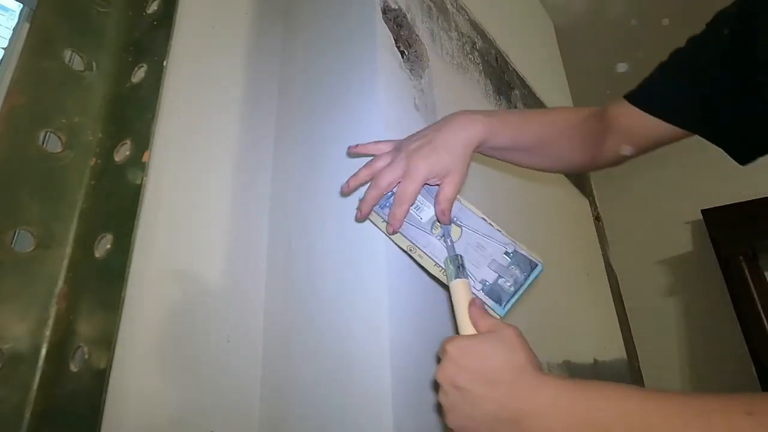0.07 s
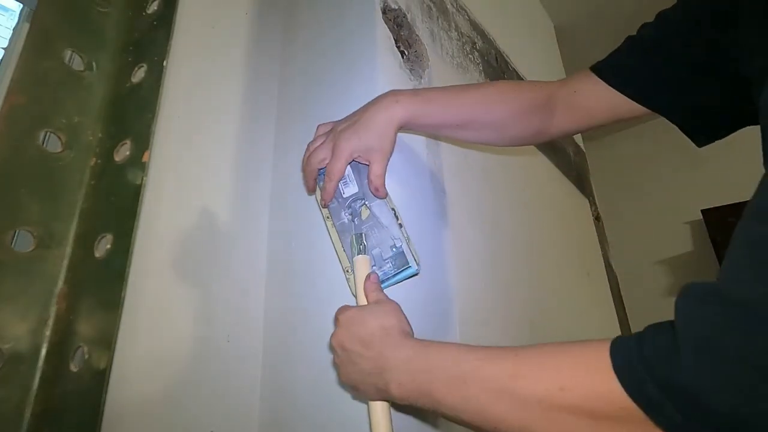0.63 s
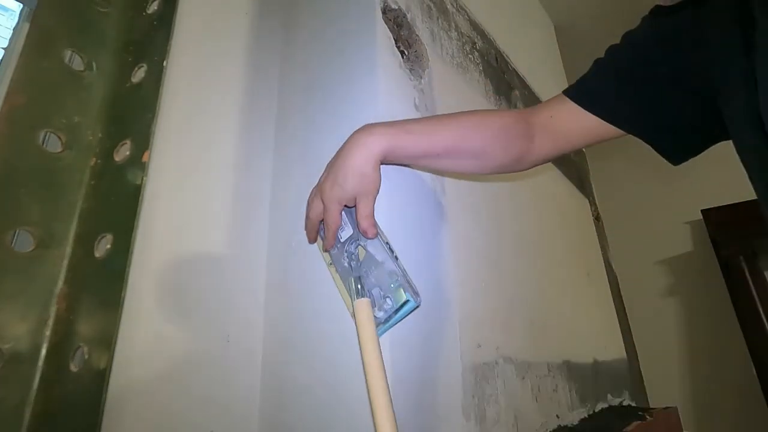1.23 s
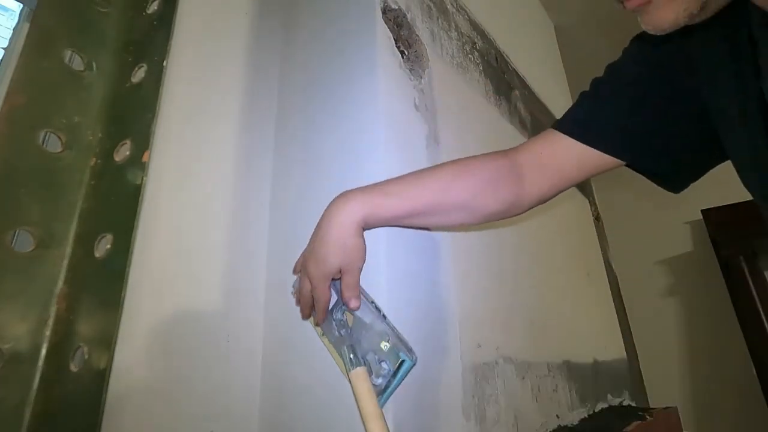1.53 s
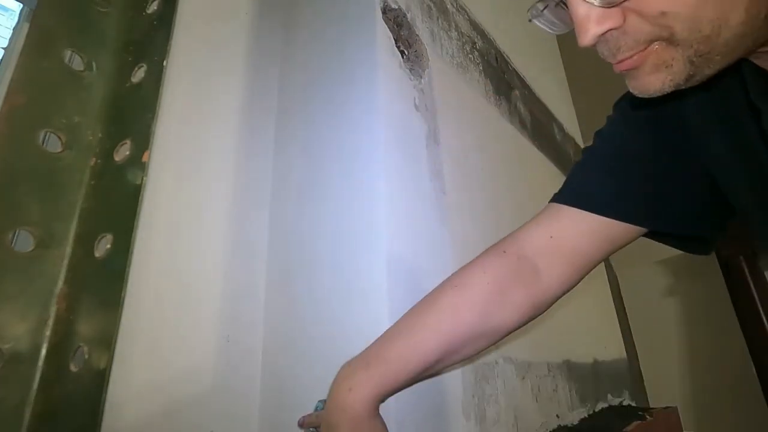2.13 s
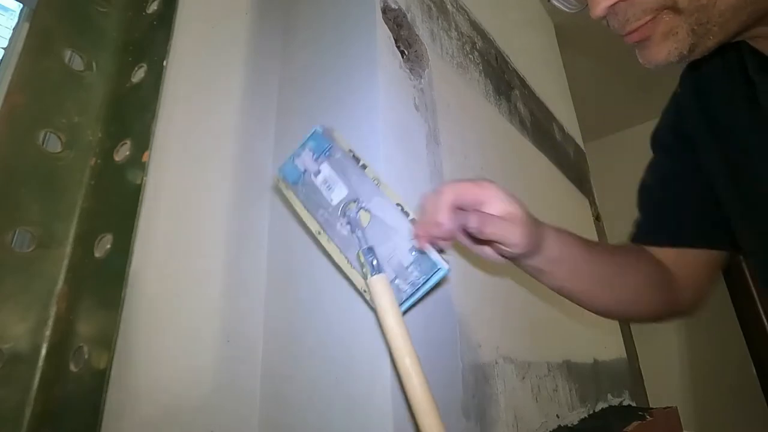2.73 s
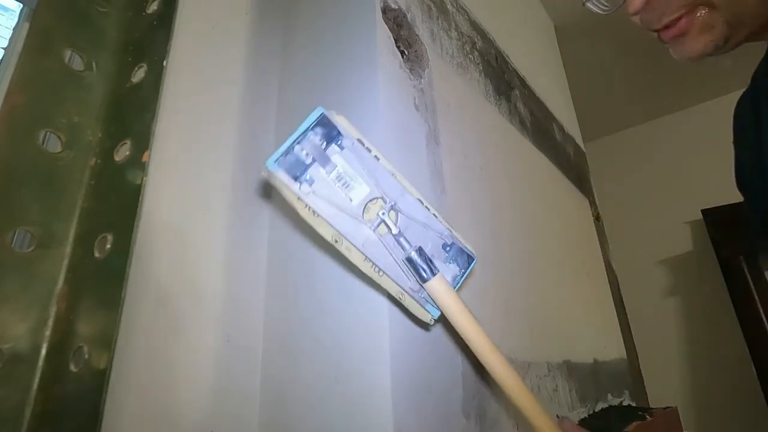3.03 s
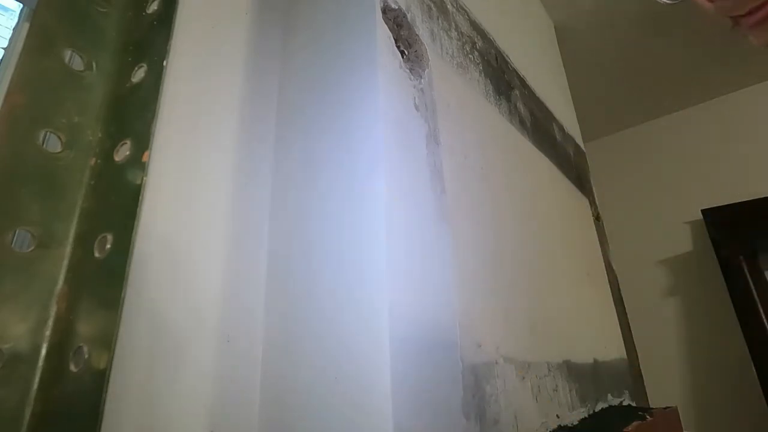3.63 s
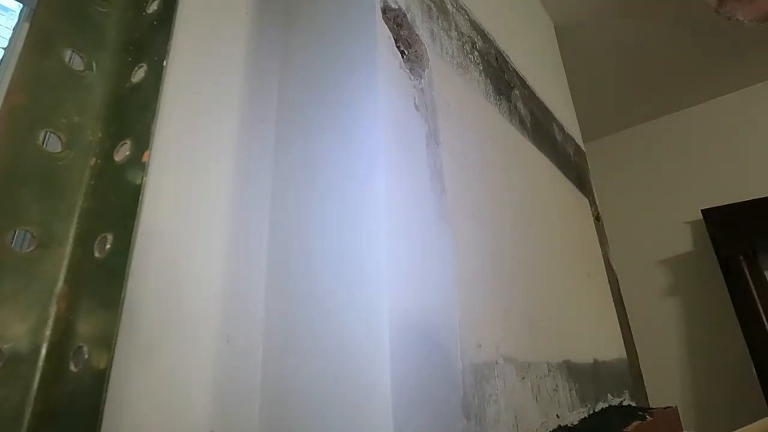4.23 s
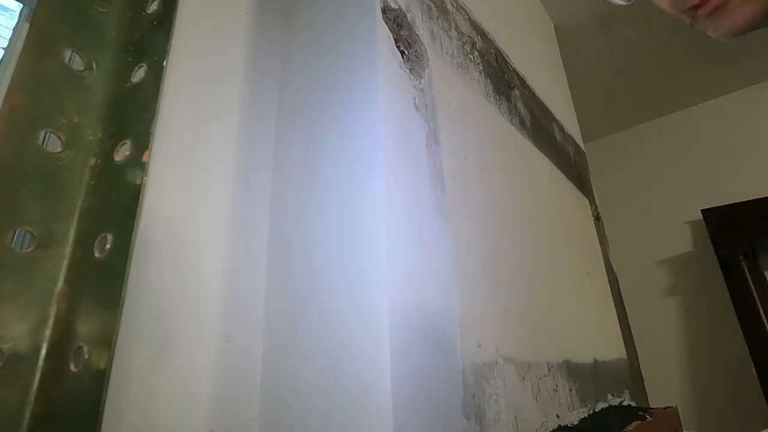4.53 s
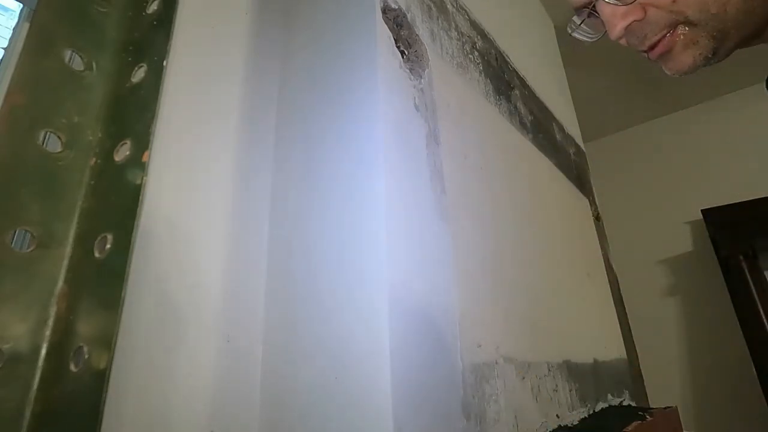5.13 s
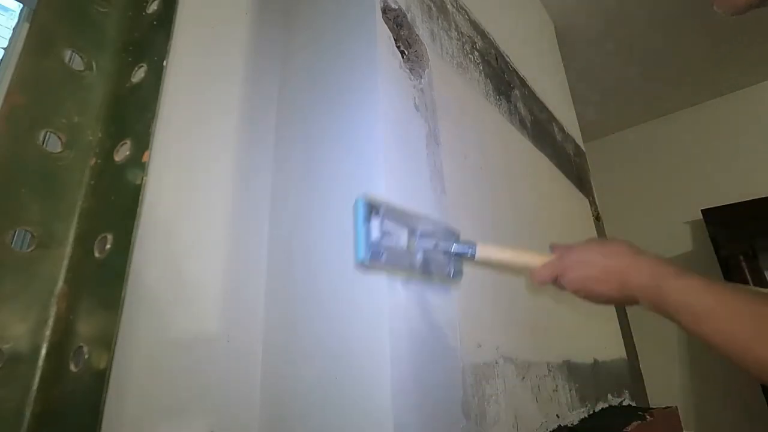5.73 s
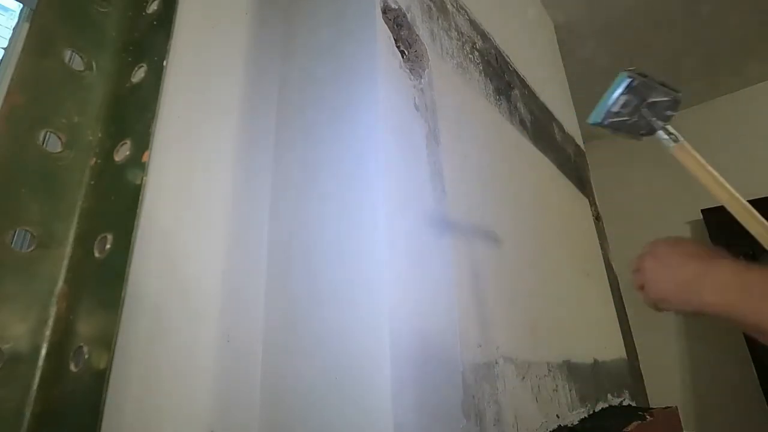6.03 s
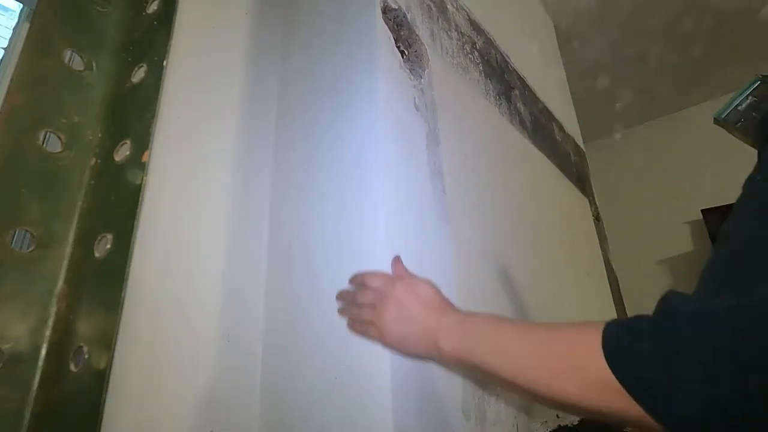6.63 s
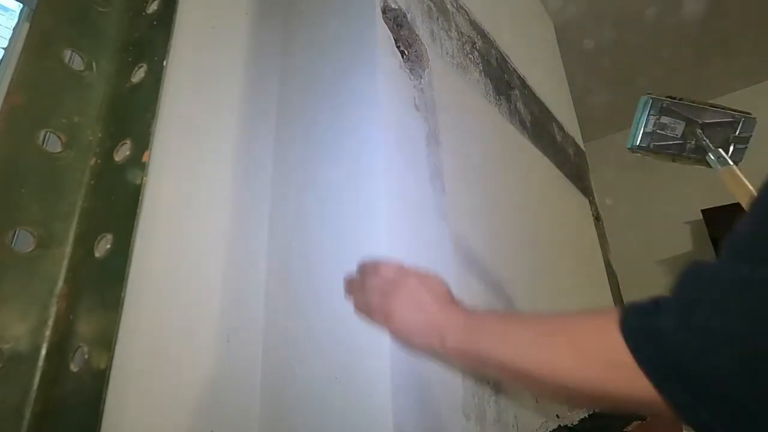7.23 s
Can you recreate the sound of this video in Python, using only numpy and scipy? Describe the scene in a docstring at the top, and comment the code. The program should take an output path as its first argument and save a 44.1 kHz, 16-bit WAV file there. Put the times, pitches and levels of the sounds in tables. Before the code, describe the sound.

A pole sander scrapes dry plaster close to the microphone in a bare, echoing room. Its plastic head clacks between short hissing strokes. During one long stroke the pole judders along the floor with a low rattle. More strokes follow, mixed with clacks, dull bumps, tiny squeaks and a longer run along the wall. Finally a bare palm brushes off the dust with a softer, hollow hiss.

```python
"""A pole sander works dry plaster, close by, in a bare, ringing room. First its plastic head clacks on
the swivel and its abrasive pad hisses in short strokes. On the long down stroke the pole judders along
the floor by stick-slip friction. More strokes follow, with clacks, dull bumps, brief squeaks and a run
along the wall. Last, a bare palm wipes off the dust with a softer, hollow hiss."""
import sys
import numpy as np
from scipy import signal
from scipy.fft import rfft, irfft
from scipy.io import wavfile
from scipy.ndimage import uniform_filter1d

SR = 44100
rng = np.random.default_rng(int(sys.argv[2]) if len(sys.argv) > 2 else 0)


def transcribe(signal):
    """Save signal, clipped to [-1, 1], as a 16-bit WAV file at the path in sys.argv[1]."""
    frames = np.atleast_2d(signal).T
    limited = np.clip(frames, -1, 1)
    pcm = np.round(limited * 32767).astype(np.int16)
    wavfile.write(sys.argv[1], SR, pcm)


N = 325899
TIME = np.arange(N) / SR
FREQ = np.fft.rfftfreq(N, 1 / SR)


def pad(catch_db=0.53, lean_db=0.97, usual_db=-40, thinning=0.42):
    """Abrasion: grains snap off the plaster, and the resonances of the pressed pad colour their hiss."""
    # short strokes: start t/s, fastest t/s, end t/s, relative level/dB, fizz/dB re hiss, note f/Hz, emphasis
    strokes = [(0.21, .295, .33, -45, -14.5, 3250, 1.2), (0.324, 0.434, .485, -54, -21, 3150, 1.1),
               (0.805, 0.853, .91, -58, -13.5, 2860, .7), (0.857, 0.95, 1.11, -60, -3, 3350, 0.55),
               (1.093, 1.179, 1.275, -33, -8.5, 3800, 0.44), (2.777, 2.85, 2.858, -50, -27, 3420, 1.2),
               (3.68, 3.74, 3.88, -49.5, -30, 3450, 4.6), (3.834, 3.997, 4.09, -41, -9, 4240, 0.23),
               (4.06, 4.069, 4.16, -56, -12.5, 3800, .4), (4.518, 4.556, 4.6, -61, -6, 3640, 0.22),
               (4.701, 4.825, 4.935, -36, -5.5, 4920, 0.84), (5.016, 5.066, 5.12, -61.5, -23, 3520, 0.37),
               (5.918, 5.958, 6.02, -51, -15, 3550, .3), (6.005, 6.01, 6.032, -46, -19, 3550, 0.86)]
    # long runs down and along the wall: t/s, relative level/dB, fizz/dB re hiss, note f/Hz, emphasis
    down_run = [(1.26, -57, -10, 3880, 0.85), (1.27, -48.5, -6.5, 4010, 0.65), (1.406, -41, -9, 3920, 0.4),
                (1.602, -42.5, -8.5, 4200, 0.93), (1.684, -37.5, -7.5, 3730, 0.36),
                (1.744, -33.5, -6.5, 4200, 0.85), (1.876, -37, 1.5, 4270, 0.85),
                (1.94, -41.5, -14, 3800, 0.68), (2.106, -47.5, -25, 3650, 0.64),
                (2.206, -55, -15, 3920, 0.76), (2.334, -50.5, -7, 4380, 0.7),
                (2.546, -48.5, -1, 4300, 0.31), (2.61, -57, -8, 4340, 0.85)]
    side_run = [(5.185, -60, -6, 3660, 0.4), (5.209, -37, -9.5, 3660, 0.15), (5.291, -35, -4.5, 3280, 0.37),
                (5.399, -36, -2.5, 3300, 0.44), (5.607, -39, -7, 3700, 0.24),
                (5.645, -36.5, -9, 3360, 0.24), (5.727, -36.5, -6.5, 3400, 0.43),
                (5.757, -40.5, -1.5, 3390, 0.3), (5.8, -58, 4, 3570, 0.31)]
    # spectrum of grit on plaster: f/Hz, spectral level/dB
    grit = [(88, -67), (150, -24), (182, -16), (212, -44), (363, -18.5), (741, -12.5), (1180, -9),
            (1370, -9.5), (3200, 0.5), (4270, 1.5), (7170, -12), (9040, -24), (11200, -26), (13000, -37),
            (14900, -50)]
    scratch = grains(per_s=22000, spread_db=2.0) * amp(catch_db * wander(130) + lean_db * wander(12))
    for hz in (2200, 3100, 5200):  # patches of the pad touch and lift, each singing its own drifting band
        touch = .45 * wander(5)
        scratch = scratch + touch * resonate(scratch, hz * np.exp(.08 * wander(3)), width_hz=350)
    body, core, fizz = split(coloured(scratch, grit), [1250, 6000])

    def rub(*controls):
        """One sliding contact, as onset and sound: low body, hiss with two resonances, and high fizz."""
        on = controls[0] > 0
        gate, db, fizz_db, note_hz, emphasis, body_db = (np.broadcast_to(c, N)[on] for c in controls)
        note = resonate(core[on], note_hz, width_hz=320)
        low_note = .29 * resonate(core[on], .35 * note_hz, width_hz=200)
        hiss = (core[on] + emphasis * (note + low_note)) / np.sqrt(1 + .5 * emphasis ** 2)
        # a thin pad radiates little bass: the body grows more slowly than the hiss
        body_db = np.minimum(body_db - thinning * (db - usual_db), -14)
        return TIME[on][0], gate * amp(db) * (hiss + amp(body_db) * body[on] + amp(fizz_db) * fizz[on])

    out = np.zeros(N)
    for start, fastest, end, db, fizz_db, note_hz, emphasis in strokes:
        arch_db = db + swing(start, fastest, end, ends_db=-19)
        add(out, *rub(window(start, end), arch_db, fizz_db, note_hz, emphasis, -20))
    for run, run_db, body_db in (down_run, 1, -20.5), (side_run, .5, -26):
        gate, db, fizz_db, note_hz, emphasis = played(run)
        note_hz = note_hz * np.exp(-.75 * np.maximum(fizz_db + 6.5, 0))  # the note dives in strong fizz
        add(out, *rub(gate, db + run_db, fizz_db, note_hz, emphasis, body_db))
    return out


def clacks(scuff_s=0.0056, tick_s=0.0077, thud_s=.011, lead_s=.006):
    """Impact excites the head's modes; the flatter the blow, the more plate and thud. Returns near, spread."""
    # blows: t/s, peak level/dB, relative plate level/dB, relative tick level/dB, rim f/Hz
    blows = [(0.017, -52, -25, -29, 3460), (0.156, -39.5, -13.5, -18, 3850),
             (0.1709, -33.5, -15, -22, 3830), (0.1964, -40.5, -12, -17, 3360),
             (0.2296, -22.5, -18, -22, 3350), (0.3103, -22.5, -26, -25.5, 3436),
             (0.4865, -43.5, 3, -5, 3900), (0.4986, -35, -10.5, -23, 3320), (0.7014, -33.5, -16, -21, 4010),
             (0.9233, -40.5, -11.5, -5, 2990), (0.9437, -39.5, -9, -27, 3420),
             (2.8438, -35.5, -21, -28.5, 3550), (2.9046, -34.5, -17.5, -23, 3543),
             (2.9893, -36, -17, -46, 3760), (3.6113, -51.5, 0, -23.5, 3800), (3.6557, -33.5, -9, -15, 3360),
             (3.6677, -25, -12, -20, 3650), (3.6738, -30, 2, -22, 3900), (3.6835, -21, -19.5, -39, 3515),
             (3.6961, -31.5, -8, -34, 3650), (3.9532, -29.5, -6, -7, 3310), (4.0539, -30, -8, -11.5, 3600),
             (4.1689, -26, -15.5, -11, 3240), (4.272, -46, -22, 3, 3740), (4.337, -36.5, -10, -10, 3190),
             (4.3475, -33, -4, -7, 3920), (5.9606, -38.5, -28, -5, 3420), (6.022, -27.5, -33, -12.5, 3680),
             (6.032, -29.5, -28, -21, 3470), (6.0652, -37, -26, -1, 3430), (6.2657, -47, -13, -20, 3980),
             (6.2808, -44, -5, -14, 3450), (6.5373, -49.5, -16, -21, 3770)]
    # modes of the broad plate and of the stiff rim (pitched at 3550 Hz): f/Hz, level/dB, t60/s
    plate_modes = [(1000, -19.5, 0.015), (1300, -2, 0.017), (1536, 3.5, 0.023), (2000, 1.5, 0.024),
                   (2250, -13, 0.0048)]
    rim_modes = [(2700, -17, 0.087), (3180, 8.5, 0.0015), (3460, -1, 0.0028), (3550, -1, 0.036),
                 (4010, 0.5, 0.008), (4700, -15.5, 0.0071)]
    t, near, spread = TIME[:6000], np.zeros(N), np.zeros(N)
    for s, db, plate_db, tick_db, rim_hz in blows:
        scuff_noise, tick_noise, thud_noise, burst_noise = rng.standard_normal((4, len(t)))
        scuff = scuff_noise * np.exp(-t / scuff_s)
        force = .5 * (t == 0) + .5 * scuff / np.linalg.norm(scuff)  # half clean impulse, half grit
        # grip and point of impact vary the modes from blow to blow
        plate = ring(plate_modes, t, spread_db=2.5, scatter=.05)
        rim = ring(rim_modes, t * rim_hz / 3550, spread_db=2.0, scatter=.02)
        plate, rim = (band(signal.fftconvolve(force, x)[:len(t)], 680, 7000) for x in (plate, rim))
        tick = band(band(tick_noise * np.exp(-t / tick_s), 3200, 5780), 1700, 9000)
        thud = band(thud_noise * np.exp(-t / thud_s), 180, 1220, order=4)
        parts = (rim, 0), (plate, plate_db + 9), (tick, tick_db + 11), (thud, plate_db - 1)
        blow = sum(amp(part_db) * x / abs(x).max() for x, part_db in parts)
        blow = amp(db) * blow / abs(blow).max()
        add(near, s, blow)
        # the pad's edge grazes the wall just before the blow
        graze = evened(band(rng.standard_normal(len(t)), 1300, 4500)) * (t / lead_s) * (t < lead_s)
        add(near, s - lead_s, amp(db - 27.5) * graze)
        # spread over all directions into the room, the modes merge into one broad burst
        burst = band(band(burst_noise * np.exp(-t / 0.004), 1800, 8000, order=1), 330, 3810, order=3)
        burst *= np.linalg.norm(blow) / np.linalg.norm(burst)
        add(spread, s, amp(-7) * (.5 * blow + burst))
    return near, spread


def judder(start_s=1.884, length_s=0.53, attack_s=.016, slips_hz=76, brake_db=-33):
    """Stick-slip friction: the pole's foot rattles over the floor and brakes; each slip shakes the wood."""
    # spectrum of the shaken pole: f/Hz, spectral level/dB
    pole = [(29, -67), (50, -3), (107, -20.5), (144, -2), (199, -2), (252, -2.5), (314, 1), (365, -5),
            (502, 3), (658, 1), (728, -9.5), (805, -1), (921, -11.5), (1810, -19), (2800, -31.5),
            (3640, -70), (6160, -120)]
    age = np.clip(TIME - start_s, 0, length_s)
    gate = np.minimum(age / attack_s, 1) * (age < length_s)
    db = -36.95 + brake_db * (age / length_s) ** 2.81
    boom_db = -2.5 - 37 * age  # the boom dies first
    cycles = np.cumsum(slips_hz * np.exp(.25 * wander(40))) / SR
    slips = .45 + np.exp(-(cycles % 1) / .35)
    slips *= amp(1.3 * evened(band(wander(60), 25, 60)))
    boom, core, rasp = split(coloured(slips * rng.standard_normal(N), pole), [350, 1000])
    core = core / np.sqrt(uniform_filter1d(core ** 2, size=2400))  # the hand pushes steadily
    return band(gate * amp(db) * (core + amp(boom_db) * boom + amp(-4.5) * rasp), 105, 5200)


def palm(flutter_db=0.4):
    """Cavity resonance: the hollow under the hand lifts one band of friction noise and damps a lower one."""
    # sweeps: start t/s, fastest t/s, end t/s, relative level/dB, fizz/dB re hiss, hollow's first, last f/Hz
    wipes = [(6.554, 6.584, 6.77, -57.5, -11.5, 3350, 3000), (6.653, 6.704, 7.08, -54, -14.5, 2760, 2480),
             (6.785, 6.92, 7.065, -54.5, -14, 2700, 1970), (7.11, 7.35, 7.52, -49, -11, 2300, 3100)]
    # spectrum of skin on dusty plaster: f/Hz, spectral level/dB
    skin_spectrum = [(180, -61), (300, -47), (365, -19), (451, -41), (586, -22), (636, -36), (911, -27.5),
                     (1670, -10), (2680, -9.5), (7030, -4), (8980, -13.5), (11300, -15.5), (14900, -38)]
    brush = grains(per_s=16000, spread_db=1.5) * amp(flutter_db * wander(70))
    skin, fizz = split(coloured(brush, skin_spectrum), [5000])
    out = np.zeros(N)
    for start, fastest, end, db, fizz_db, from_hz, to_hz in wipes:
        hollow_hz = np.interp(TIME, [start, end], [from_hz, to_hz])
        hiss = skin + 1.1 * resonate(skin, hollow_hz, width_hz=480)
        hiss = evened(hiss - .65 * resonate(hiss, .55 * hollow_hz, width_hz=650))
        level = window(start, end) * amp(db + swing(start, fastest, end, ends_db=-10))
        out += level * (hiss + amp(fizz_db) * fizz)
    return out


def bumps(width_hz=130):
    """Damped resonance: soft blows on wood and wall each leave a short rumble round one pitch."""
    # blows of pole and hand: t/s, level/dB, f/Hz, t60/s
    blows = [(3.667, -58, 272, 0.58), (4.169, -56, 202, 0.22), (4.339, -56.5, 400, 0.35),
             (4.37, -58.5, 234, 0.21), (5.297, -68, 363, 0.061), (6.031, -60, 443, 0.27),
             (6.086, -68, 284, 0.34), (6.270, -62, 600, 0.77), (6.576, -69, 172, 0.4)]
    t, out = TIME[:SR // 2], np.zeros(N)
    for s, db, hz, t60 in blows:
        force = rng.standard_normal(len(t)) * decay(t, t60)
        rumble = resonate(resonate(force, hz, width_hz), hz, 2 * width_hz)
        add(out, s, amp(db) * rumble / rumble[:1300].std())
    return band(out, 119, 2000, order=5)


def squeaks(waver=0.004, rough_db=-2.0):
    """Friction-driven oscillation: the swivel binds for a moment and sings a thin, unsteady note."""
    # moments of binding: t/s, duration/s, f/Hz, level/dB
    binds = [(4.051, 0.009, 2670, -43.5), (4.165, 0.021, 1690, -48.5), (4.585, 0.014, 1187, -59.5),
             (5.926, 0.1, 1635, -61)]
    out, bend, grip = np.zeros(N), 1 + waver * wander(150), amp(rough_db * wander(110))
    for s, length, hz, db in binds:
        at = np.arange(round(s * SR), round((s + length) * SR))
        phase = 2 * np.pi * np.cumsum(hz * bend[at]) / SR
        note = np.sin(phase) * grip[at] * signal.windows.tukey(len(at), .4)
        add(out, s, amp(db) * evened(note))
    return out


def room_tail(first_s=0.0017, echoes_per_s=5000):
    """Reverberation: dense reflections off bare walls, each band dying at its own rate; energy 1."""
    # reverberation times: f/Hz, t60/s
    room = [(100, 1.8), (300, 1.88), (600, 1.29), (1200, 0.98), (3500, 0.86), (6000, 0.83), (12000, 0.77)]
    size = 2 * SR
    echoes = rng.standard_normal(size) * (rng.random(size) < echoes_per_s / SR) * (TIME[:size] > first_s)
    hz, t, bands = signal.stft(echoes, SR, nperseg=256)
    tail = signal.istft(bands * decay(t, read(room, hz)[:, None]), SR, nperseg=256)[1]
    return tail / np.linalg.norm(tail)


def standing_waves(x):
    """Room resonance: low standing waves ring on after x excites them."""
    # room modes: f/Hz, level/dB, t60/s
    modes = [(46, 4, 5), (150.3, -9.5, 6), (166.6, -6, 6.5), (224, -11, 3.6), (353.6, -4.5, 3.5),
             (424.7, -1, 2.9), (458, 7, 1.36), (470, -5.5, 3), (596, -13, 1.7)]
    return echo(x, ring(modes, TIME[:3 * SR]))


def lingering(tail, db=-64):
    """Reverberant decay: at the start the room still rings from handling just before."""
    out, late = np.zeros(N), band(tail[SR // 4:], 280, 4400, order=3)
    add(out, 0, amp(db) * late / late[:4000].std())
    return out


def hush():
    """Stationary random noise: a faint, dark background."""
    # background spectrum: f/Hz, spectral level/dB
    spectrum = [(15, -62.5), (25, -6), (71, -17), (224, -5), (372, -9), (449, -5), (924, -12),
                (1490, -10.5), (6680, -31), (9210, -48), (14900, -38)]
    return amp(-73.5) * band(coloured(rng.standard_normal(N), spectrum), 110, 16000)


def ports(mono):
    """Decorrelation: two close microphone ports hear alike but for a random flutter in the top treble."""
    # difference between the ports: f/Hz, side level/dB re mid
    difference = [(100, -45.5), (400, -62.5), (1200, -39.5), (4000, -57.5), (8000, -23.5), (10500, -23.5),
                  (12000, -3.5), (13200, -0.5), (15000, 2)]
    side = irfft(rfft(mono * wander(150)) * amp(read(difference, FREQ)), N)
    return np.array([mono + side, mono - side])


def amp(db):
    """Decibels to amplitude ratio."""
    return 10 ** (np.asarray(db) / 20)


def evened(x):
    """Normalisation to rms 1."""
    return x / np.sqrt(np.mean(x ** 2) + 1e-20)


def decay(t, t60):
    """Exponential decay, by 60 dB in t60."""
    return np.exp(-np.log(1000) * t / t60)


def read(points, hz):
    """Interpolation on a log-frequency axis."""
    f, value = np.transpose(points)
    return np.interp(np.log(hz + 1), np.log(f + 1), value)


def add(mix, s, sound):
    """Superposition of a sound at time s."""
    part = mix[max(round(s * SR), 0):][:len(sound)]
    part += sound[:len(part)]


def coloured(x, spectrum):
    """Spectral shaping, to rms 1."""
    return evened(irfft(rfft(x) * amp(read(spectrum, FREQ)), N))


def split(x, edges_hz):
    """Soft crossover into bands of rms 1."""
    below = [0] + [1 / (1 + (FREQ / hz) ** 8) for hz in edges_hz] + [1]
    return [evened(irfft(rfft(x) * (upper - lower), N)) for lower, upper in zip(below, below[1:])]


def band(x, lo_hz, hi_hz, order=2):
    """Causal band-pass."""
    return signal.sosfilt(signal.butter(order, [lo_hz, hi_hz], "band", fs=SR, output="sos"), x)


def wander(rate_hz):
    """Low-pass random fluctuation of rms 1."""
    return evened(irfft(rfft(rng.standard_normal(N)) / (1 + (FREQ / rate_hz) ** 4), N))


def grains(per_s, spread_db):
    """Shot noise: random clicks, most small and a few large."""
    size = amp(spread_db * np.minimum(rng.exponential(1, N), 4)) * rng.choice([-1, 1], N)
    return evened(size * (rng.random(N) < per_s / SR))


def resonate(x, hz, width_hz):
    """A resonance of gain 1 that follows the curve hz."""
    turn = np.exp(2j * np.pi * np.cumsum(hz * np.ones(len(x))) / SR)
    radius = np.exp(-np.pi * width_hz / SR)
    return 2 * (turn * signal.lfilter([1 - radius], [1, -radius], x / turn)).real


def ring(modes, t, spread_db=0, scatter=0):
    """Free vibration: damped modes of random sign, with optional scatter in strength and pitch."""
    hz, db, t60 = np.transpose(modes)[:, :, None]
    hz = hz * (1 + scatter * rng.standard_normal(hz.shape))
    strength = amp(db + spread_db * rng.standard_normal(hz.shape)) * rng.choice([-1, 1], hz.shape)
    return (strength * decay(t, t60) * np.sin(2 * np.pi * hz * t)).sum(0)


def echo(x, tail):
    """Convolution with a response scaled to energy 1."""
    return signal.oaconvolve(x, tail / np.linalg.norm(tail))[:N]


def window(start, end, fade_s=0.03):
    """A gate that is open from start to end."""
    return np.clip(np.minimum(TIME - start, end - TIME) / fade_s + .5, 0, 1)


def played(rows):
    """Interpolation in time: a gate open while the curve lasts, then its columns at every sample."""
    s, *columns = np.transpose(rows)
    return [window(s[0], s[-1])] + [np.interp(TIME, s, c) for c in columns]


def swing(start, fastest, end, ends_db):
    """Friction noise grows with speed: the arch in dB of one swing of the arm."""
    return ends_db * np.interp(TIME, [start, fastest, end], [-1, 0, 1]) ** 2


def scene():
    """Direct plus reverberant field: each near source feeds the room by its own amount."""
    tail = room_tail()
    hiss, wipe, drag = amp(-3.0) * pad(), amp(-1.7) * palm(), judder()
    handling = bumps() + squeaks()
    clack, clack_spread = clacks()
    direct = hiss + wipe + drag + clack + handling
    sent = amp(-9.5) * hiss + amp(-8.0) * wipe + amp(-11) * drag + clack_spread + amp(-8.5) * handling
    room = echo(sent, tail) + amp(-30) * standing_waves(drag + handling) + lingering(tail)
    return ports(direct + room + hush())


def record(dry, notch_hz=9040, notch_width_hz=650, edge_hz=14800):
    """Frequency response of the microphone: a narrow treble notch, then the band limit."""
    notched = signal.lfilter(*signal.iirnotch(notch_hz, notch_hz / notch_width_hz, SR), dry)
    low_pass = signal.firwin(511, edge_hz, window=("kaiser", 9), fs=SR)
    return signal.oaconvolve(notched, low_pass[None], "same")


dry = scene()
out = record(dry)
transcribe(out)
```